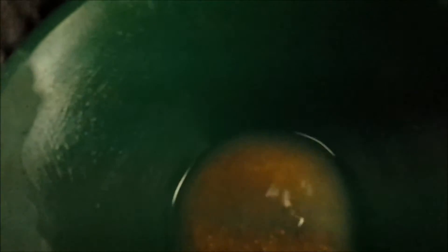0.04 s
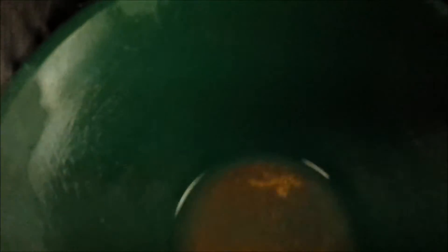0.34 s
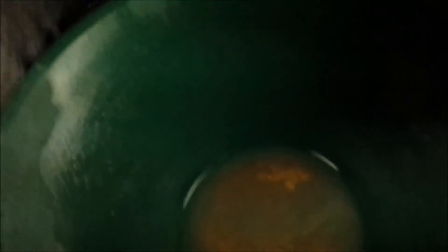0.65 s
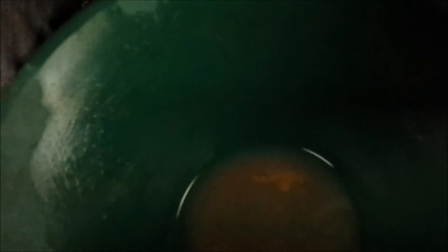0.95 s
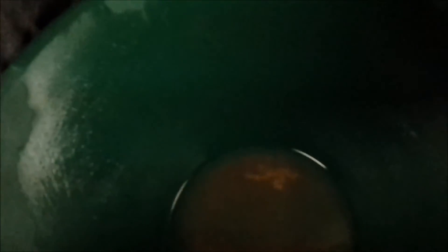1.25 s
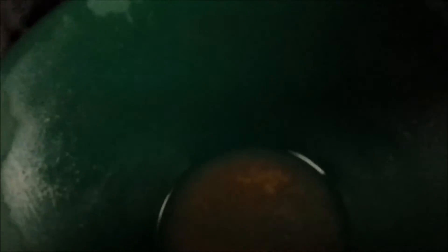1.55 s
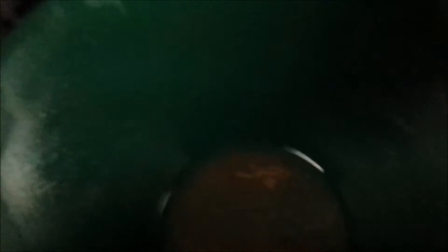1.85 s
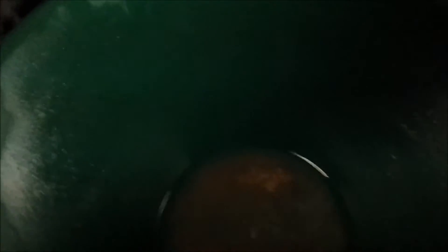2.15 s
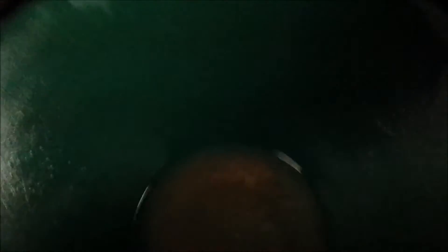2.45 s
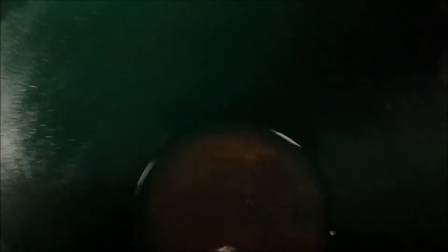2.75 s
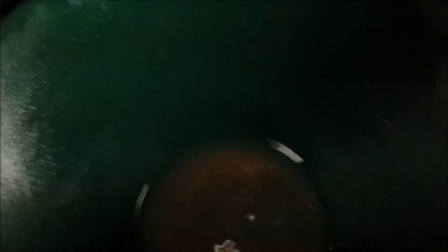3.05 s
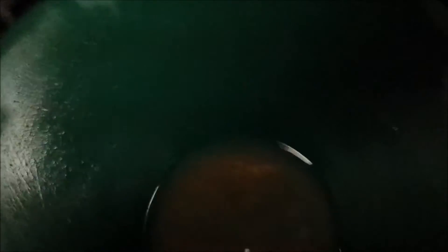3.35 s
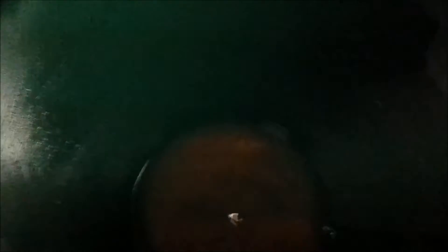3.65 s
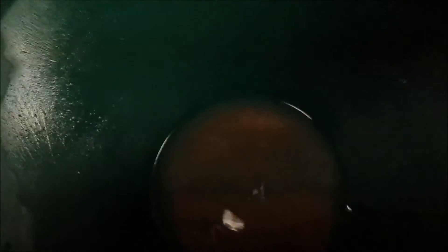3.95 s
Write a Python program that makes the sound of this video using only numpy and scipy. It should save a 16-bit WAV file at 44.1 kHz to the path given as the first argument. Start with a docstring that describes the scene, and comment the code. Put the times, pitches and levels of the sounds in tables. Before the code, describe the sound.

Soft, quick finger taps thump on a hollow container, following a brief brush, faint knocks and a small click. The close-up drumming builds and holds steady, with slight skin rustle and low room hum behind it.

```python
"""A hand brushes a hollow vessel close to the microphone, over the hum and hiss of a quiet room.
Faint knocks and a small click follow, then soft, quick taps, most likely two fingertips drumming in turn.
Each tap pushes the wall in with a dull thump, slides with a short hiss and lifts off with a tiny pop.
The taps grow louder and settle at about nine a second, with the hand rustling faintly beneath them."""
import sys
import numpy as np
from scipy import signal
from scipy.fft import rfft, irfft
from scipy.io import wavfile
from scipy.ndimage import uniform_filter1d

SR = 44100
rng = np.random.default_rng(int(sys.argv[2]) if len(sys.argv) > 2 else 0)


def unload_audio(sound):
    """Save the sound as a 16-bit wav file, at the path given as the first command line argument."""
    columns = np.transpose(np.atleast_2d(sound))
    # keep every value between -1 and 1, then stretch to whole-number steps
    steps = np.round(np.clip(columns, -1, 1) * 32767)
    wavfile.write(sys.argv[1], SR, steps.astype(np.int16))


N = 176400


def amp(db):
    """Decibels to gain."""
    return 10 ** (np.asarray(db) / 20)


def unit(x):
    """Scales to rms 1."""
    return x / np.sqrt(np.mean(x ** 2) + 1e-20)


def curve(points, hz):
    """Reads a table on a log-frequency axis."""
    f, value = np.transpose(points)
    return np.interp(np.log(hz + 1), np.log(f + 1), value)


def add(mix, at_s, sound):
    """Adds a sound to the stereo mix at a time."""
    part = mix[:, round(at_s * SR):][:, :sound.shape[-1]]
    part += sound[..., :part.shape[1]]


def butter(x, hz, kind):
    """Second-order low-pass or high-pass."""
    return signal.lfilter(*signal.butter(2, hz, kind, fs=SR), x)


def swell(peak_s, rise_s, fall_s, db):
    """A bell-shaped level with its own rise and fall."""
    t = np.arange(N) / SR - peak_s
    width_s = np.where(t < 0, rise_s, fall_s)
    return amp(db) * np.exp(-.5 * np.minimum((t / width_s) ** 2, 100))


# Likeness of the microphone's left and right sides (frequency [Hz], correlation [0-1])
STEREO_LIKENESS = [(60, 0.4), (130, 0.56), (300, 0.99), (640, .45), (1400, 0), (15000, 0.01)]
def noise(colour, lean=None):
    """Stereo noise of a given colour, alike in the bass and unrelated in the treble."""
    hz = np.fft.rfftfreq(N, 1 / SR)
    left, unrelated = rfft(rng.standard_normal((2, N)))
    likeness = curve(STEREO_LIKENESS, hz)
    right = likeness * left + np.sqrt(1 - likeness ** 2) * unrelated
    spectrum = np.array([left, right]) * amp(curve(colour, hz))
    if lean is not None:
        spectrum *= amp(np.outer([.5, -.5], curve(lean, hz)))
    return unit(irfft(spectrum, N))


def tone(hz, width_hz):
    """Noise in one resonance."""
    f = np.fft.rfftfreq(N, 1 / SR)
    white = rfft(noise([(1, 0), (SR, 0)]))
    return unit(irfft(white / (1 + (2 * (f - hz) / width_hz) ** 2), N))


# Room tone behind the vessel (frequency [Hz], relative level [dB])
ROOM_COLOUR = [(15, -35), (25, -9), (33, -16), (76, -10.5), (145, -12), (179, 2.5), (240, -12.5), (349, -7),
               (378, -10), (432, -7), (534, -17), (644, -10.5), (796, -18.5), (1970, -20), (2640, -24),
               (6700, -27), (14500, -25.5)]
# Steady tones in the room (frequency [Hz], width [Hz], level [dB])
ROOM_TONES = [(353.2, 11, -75.5), (6720, 1500, -75.5), (10230, 83, -85.5), (11700, 60, -84.5)]
def room():
    """The quiet room around the microphone: hiss, a low hum and faint high whines."""
    lean = [(100, 0), (700, 3), (1300, -1), (2400, -3), (4400, 3.5), (8100, -3)]
    hiss = amp(-64.5) * noise(ROOM_COLOUR, lean)
    return hiss + sum(amp(db) * tone(hz, width) for hz, width, db in ROOM_TONES)


def friction(x, depth_db=0.5, grain_s=0.00084):
    """Rubbing skin catches unevenly from moment to moment."""
    catches = unit(uniform_filter1d(rng.standard_normal(N), round(grain_s * SR)))
    return x * amp(depth_db * catches)


# Skin sliding on the wall, heard close up (frequency [Hz], relative level [dB])
SKIN_COLOUR = [(410, -19), (700, -3), (1060, -1.5), (1350, -8), (1640, -1), (2220, -10), (2900, -4),
               (3780, -5), (4080, -7.5), (4400, -7.5), (5390, -4.5), (6040, 1.5), (7220, -6.5),
               (10600, -15.5), (14500, -20)]
# Where the rubbing sits at the microphone (frequency [Hz], left minus right [dB])
RUB_LEAN = [(300, 1), (770, 2), (1170, -6.5), (1790, -3.5), (2740, -2.5), (4180, 0), (6400, 5), (9780, -7),
            (15000, -1)]
# Light strokes over the wall (peak time [s], rise [s], fall [s], level [dB])
LIGHT_STROKES = [(.02, .05, 0.02, -68.5), (.165, 0.083, 0.092, -60.5), (.75, .1, 0.28, -74),
                 (1.37, 0.026, 0.037, -66.5), (1.5, 0.057, 0.072, -60)]
# The one firm stroke (frequency [Hz], relative level [dB])
FIRM_COLOUR = [(120, -55), (200, -13), (349, -15), (448, -6.5), (586, -9), (809, -10.5), (1000, 7),
               (1160, -28), (1360, -0.5), (2060, -13), (2370, -7), (4290, -14), (6830, -11.5), (11900, -22),
               (14500, -24)]
# Its whistles (peak time [s], rise and fall [s], frequency [Hz], width [Hz], level before panning [dB])
FIRM_WHISTLES = [(0.208, 0.011, 1140, 450, -54), (0.237, 0.0048, 1410, 400, -48)]
def brushing():
    """The hand brushes the vessel near the microphone; one firm stroke whistles hollowly to the right."""
    out = sum(swell(*row) for row in LIGHT_STROKES) * noise(SKIN_COLOUR, RUB_LEAN)
    out += swell(peak_s=.212, rise_s=.024, fall_s=.018, db=-48) * noise(FIRM_COLOUR, RUB_LEAN)
    for peak_s, slope_s, hz, width_hz, db in FIRM_WHISTLES:
        out += swell(peak_s, slope_s, slope_s, db) * tone(hz, width_hz) * amp([[-4], [2]])
    return friction(out)


def ring(force, modes):
    """A force sets decaying modes ringing."""
    t = np.arange(SR // 5) / SR
    response = sum(amp(db - 60 * t / t60) * np.cos(2 * np.pi * hz * t) for hz, db, t60 in modes)
    return signal.fftconvolve(force, response[None], axes=1)


# Low modes of the vessel (frequency [Hz], relative level [dB], time to fall 60 dB [s])
BODY_MODES = [(80, -8.5, 0.022), (112.6, -31.5, 0.29), (218, -34, 0.027)]
def thump(push_ms, db, held_s=0.024):
    """A soft pad presses the wall in; the low modes answer and are damped as it leaves."""
    roundness, damp_db, damp_delay_s, damp_s = 2.33, -9.5, 0.0016, 0.002
    t = np.arange(SR // 20) / SR
    push = abs(np.sin(np.pi * np.minimum(t / (push_ms * 1e-3), 1))) ** roundness
    body = butter(ring(-np.diff(push)[None], BODY_MODES), hz=44.7, kind="high")
    since_damping = np.arange(body.shape[1]) / SR - held_s - damp_delay_s
    body *= amp(damp_db * (1 + np.tanh(since_damping / damp_s)) / 2)
    return amp(db) * body / abs(body).max() * amp([[-.4], [.4]])


# Upper modes of the wall (frequency [Hz], relative level [dB], time to fall 60 dB [s])
WALL_MODES = [(417, 1.5, 0.0086), (613, -3, 0.024), (1016, 0, 0.026), (1555, 8.5, 0.013), (2870, 3, 0.008),
              (6150, -13, .01)]
def tick(db, length_s=0.0018, stereo_spread=0.48):
    """A tiny rough contact rings the upper modes of the wall."""
    t = np.arange(SR // 50) / SR
    grit = rng.standard_normal((3, len(t))) * t * np.exp(-2 * t / length_s)
    force = butter(grit[0] + stereo_spread * grit[1:], hz=225, kind="high")
    wall = ring(butter(force, hz=575, kind="low"), WALL_MODES)
    return amp(db) * wall / abs(wall).max()


# Faint knocks, close up (time [s], push length [ms], thump level [dB], tick level [dB])
FAINT_KNOCKS = [(.212, 9.4, -48.5, -48), (1.1492, 4.2, -56, -49.5), (1.177, 11, -61, -74)]
def knocks():
    """The hand knocks the vessel lightly before the drumming."""
    out = np.zeros((2, N))
    for at_s, push_ms, thump_db, tick_db in FAINT_KNOCKS:
        add(out, at_s, thump(push_ms, thump_db))
        add(out, at_s, tick(tick_db))
    return out


def click(at_s=1.1632, decay_s=.0009, peak_db=-39.5):
    """One sharp little click between the last two knocks."""
    out = np.zeros((2, N))
    t = np.arange(SR // 50) / SR
    burst = noise(SKIN_COLOUR, RUB_LEAN)[:, :len(t)] * np.exp(-t / decay_s)
    add(out, at_s, amp(peak_db) * burst / abs(burst).max())
    return out


# Fingertips on the vessel, close to the microphone (time [s], push length [ms], thump level [dB],
# tick level [dB], slide level [dB], time held [ms], pop level [dB])
FINGER_TAPS = [(1.382, 13.5, -39, -40.5, -50.5, 35, -56), (1.589, 13.4, -46.5, -54, -63, 47, -67),
               (1.7077, 9.6, -37, -52, -57.5, 28, -65), (1.8082, 6.6, -29, -48.5, -50, 33, -74),
               (1.9246, 6.36, -27.5, -45, -52.5, 28, -68), (2.0276, 6.4, -26.5, -45.5, -52.5, 27, -57),
               (2.1472, 7.8, -32, -49, -65, 22, -66), (2.2449, 7.5, -26.5, -35.5, -52.5, 20, -60),
               (2.3525, 6.6, -19.5, -38.5, -46, 34, -53), (2.45, 6.25, -19.5, -41.5, -46.5, 35, -51),
               (2.5646, 6.9, -21.5, -38, -51, 29, -57.5), (2.6719, 7, -21.5, -36, -51, 27.6, -54),
               (2.7803, 6.5, -18.6, -37, -49.5, 31, -49.5), (2.8788, 5.85, -18.4, -39.5, -46.5, 36, -53.5),
               (2.9947, 5.6, -17, -37.5, -47, 36, -48), (3.0897, 6.2, -20, -45, -46.5, 40, -55),
               (3.203, 6.7, -19, -35.5, -47, 37, -58), (3.3043, 6, -18.5, -38, -46, 34, -44),
               (3.42, 5.27, -18.5, -35.5, -48.5, 29, -59), (3.5265, 4.95, -15.5, -37, -44.5, 39, -50.5),
               (3.631, 5.55, -17.5, -41.5, -45.5, 36, -47.5), (3.7423, 5.46, -17, -40, -46, 32, -46),
               (3.8516, 6, -17.5, -37, -47.5, 33.5, -43), (3.9543, 5.54, -15.5, -39, -42.5, 38.5, -40.5)]
# The finger drawing back (frequency [Hz], relative level [dB])
DRAW_BACK_COLOUR = [(60, 12), (120, 8.5), (230, 14.5), (500, 5.5), (1100, -1), (1550, 3.5), (2200, -2),
                    (3000, -3.5), (4400, -2.5), (6100, -2.5), (8500, -5), (14500, -13.5)]
# The hand's faint rustle as it drums (peak time [s], rise [s], fall [s], level [dB])
HAND_RUSTLE = [(3.16, 0.86, 2.3, -62.5)]
def taps():
    """Thump and tick on contact, a hiss as the pad slides, a pop as it lifts, a hiss as it draws back."""
    out, draw_back = np.zeros((2, N)), np.zeros(N)
    slide = sum(swell(*row) for row in HAND_RUSTLE)
    for at_s, push_ms, thump_db, tick_db, slide_db, held_ms, pop_db in FINGER_TAPS:
        held_s, pushed_s = held_ms * 1e-3, at_s + push_ms * 1e-3
        add(out, at_s, thump(push_ms, thump_db, held_s))
        add(out, at_s, tick(tick_db))
        add(out, at_s + held_s, pop(pop_db))
        slide += swell(pushed_s + .0056, rise_s=.0039, fall_s=.0086, db=slide_db)
        draw_back += swell(at_s + .051, rise_s=.021, fall_s=.018, db=slide_db - 7.5)
    rubbing = slide * noise(SKIN_COLOUR, RUB_LEAN) + draw_back * noise(DRAW_BACK_COLOUR, RUB_LEAN)
    return out + friction(rubbing)


def pop(db, centre_hz=963, pitch_spread=0.032, rise_s=0.0015):
    """The pad unsticks: a little grit and a few cycles of a hollow note, right of centre."""
    t = np.arange(SR // 50) / SR
    hz = centre_hz * np.exp(pitch_spread * rng.standard_normal())
    note = t / rise_s * np.exp(1 - t / rise_s) * np.sin(2 * np.pi * hz * t)
    out = tick(db + 0.5)
    add(out, 0, amp(db) * note * amp([[-2.75], [2.75]]))
    return out


def scene():
    """Drumming and handling close to the microphone, the room behind."""
    return taps() + brushing() + knocks() + click() + room()


def record(dry):
    """The recorder cuts off the highest treble."""
    edge_hz = 14750
    low_pass = signal.firwin(511, edge_hz, window=("kaiser", 9), fs=SR)
    return signal.oaconvolve(dry, low_pass[None], "same")


dry = scene()
out = record(dry)
unload_audio(out)
```